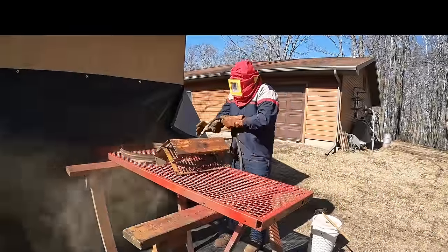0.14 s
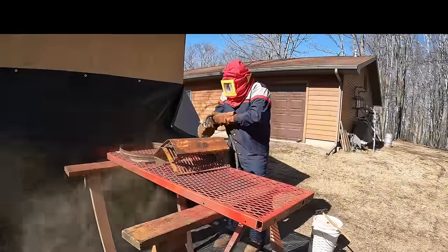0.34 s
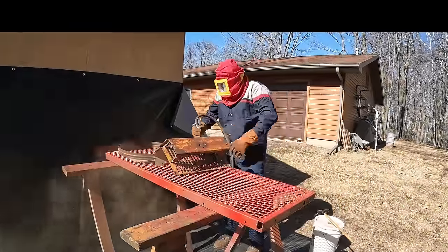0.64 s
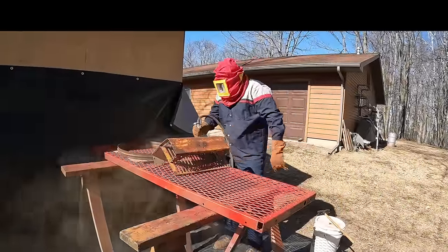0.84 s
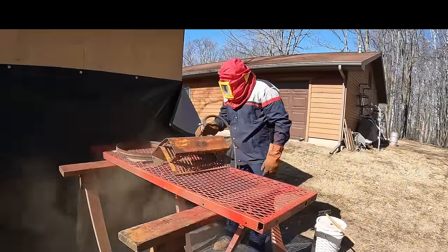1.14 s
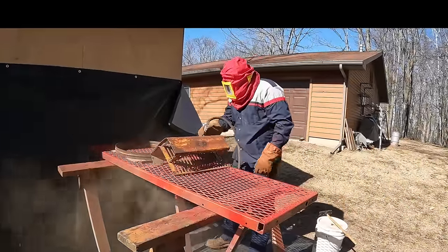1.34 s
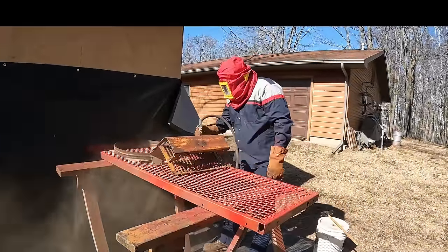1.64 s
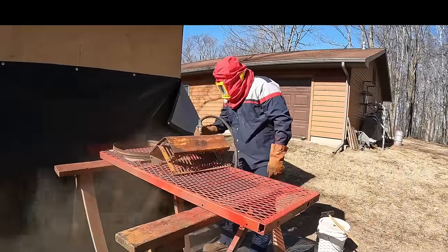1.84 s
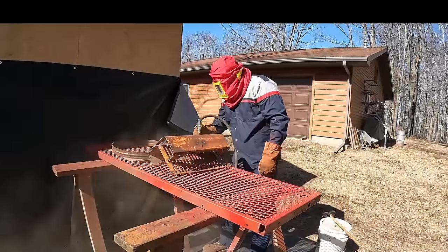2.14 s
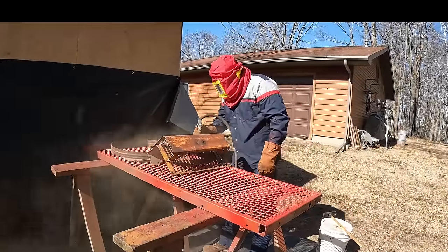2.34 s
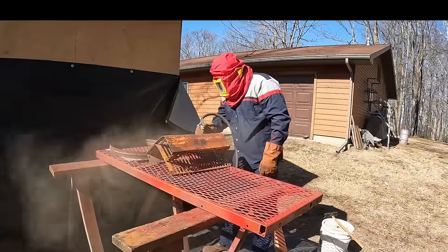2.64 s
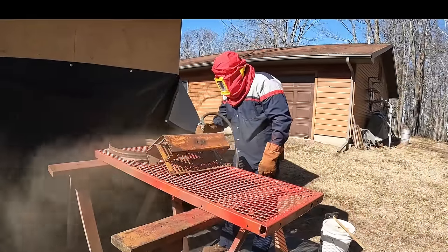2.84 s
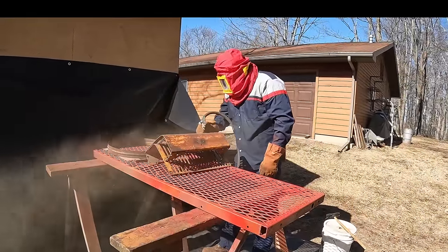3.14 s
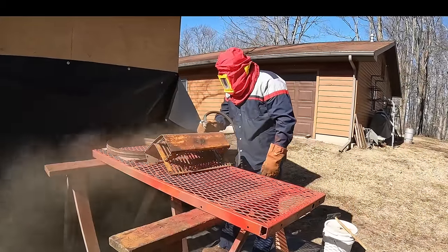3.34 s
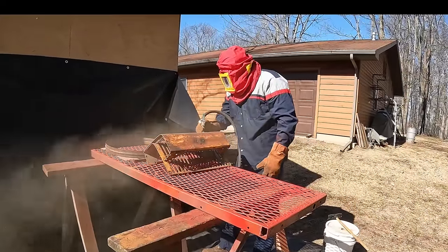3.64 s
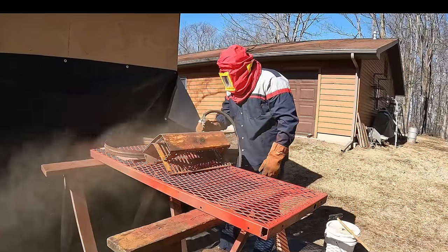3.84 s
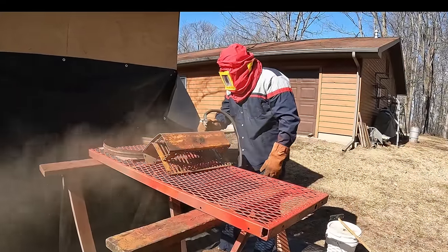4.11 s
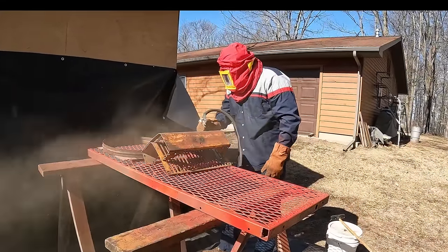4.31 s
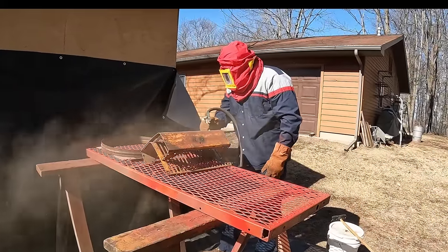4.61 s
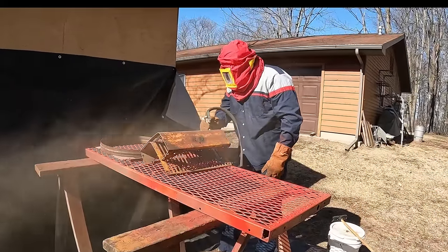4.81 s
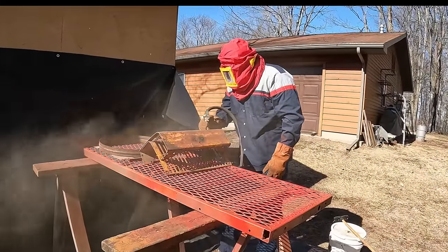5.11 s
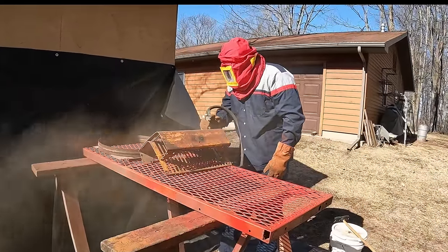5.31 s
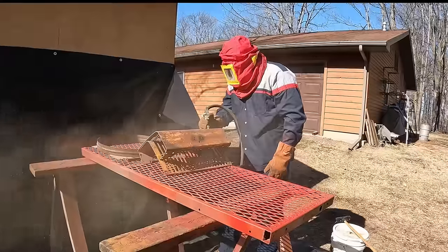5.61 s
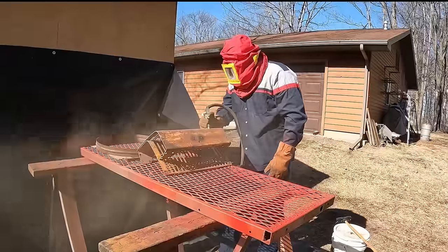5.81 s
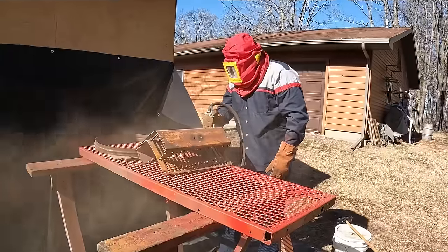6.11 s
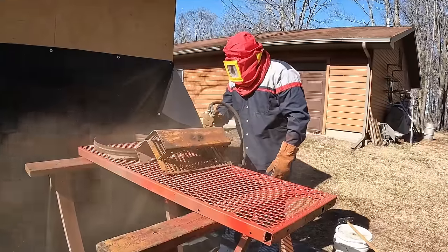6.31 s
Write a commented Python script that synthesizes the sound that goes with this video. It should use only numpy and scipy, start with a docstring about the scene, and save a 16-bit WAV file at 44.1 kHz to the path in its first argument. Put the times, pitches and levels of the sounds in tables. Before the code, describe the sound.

A quiet airy hiss rapidly swells into a strong, bright blast of air and grit against ribbed steel on a mesh table. A soft low push marks the landing. The jet then sweeps to and fro quickly, its metallic sizzle pulsing and dipping slightly as it slips off the edge. Light breeze and air puffs rumble at one outdoor microphone a few metres away; dry and open, without echo.

```python
"""Outdoors, a few metres from one microphone, a sandblaster scours a rusty steel part on a mesh table.
The jet of air and grit builds up, then the nozzle wags to and fro, about nine passes a second.
Filtered noise makes most layers: the jet hisses and fizzes, grit rings the steel, and each pass throws
roaring air and a puff at the microphone. The low thump and the shove of each puff are smooth pulses.
After about every second pass the jet slips off the part and the sound usually drops. A breeze rumbles."""
import sys
import numpy as np
from scipy import signal
from scipy.fft import rfft, irfft
from scipy.io import wavfile
from scipy.ndimage import uniform_filter1d

SR = 44100
rng = np.random.default_rng(int(sys.argv[2]) if len(sys.argv) > 2 else 0)


def to_wav(sig):
    """Store sig (one row per channel, or 1-D mono) as 16-bit WAV at the path in sys.argv[1].

    Samples outside -1..1 are clipped; the rate is SR.
    """
    pcm = np.clip(np.atleast_2d(sig), -1, 1) * 32767
    pcm = np.round(pcm).astype(np.int16)
    wavfile.write(sys.argv[1], SR, pcm.T)  # frames by channels


N = 284886  # length in samples

# slow level of the jet, before passes and slips: (time [s], hiss [dB], fizz of the top octave [dB])
JET_LEVELS = [(0, -38.5, -39), (.12, -35.5, -36.5), (.24, -31, -31), (.32, -26.5, -27), (.39, -19, -15.5),
              (.45, -21, -17.5), (.52, -16, -17.5), (.63, -19, -21), (.78, -22, -22.5), (1.08, -21.5, -21),
              (1.4, -19.5, -20), (1.9, -18.5, -21), (2.28, -17.5, -24), (2.45, -24.5, -27), (2.7, -18, -20),
              (3.15, -19, -20), (4, -19, -21.5), (5, -18.5, -22.5), (5.7, -18.5, -19.5), (6.46, -19, -20.5)]
# slow levels between passes: (time [s], steel ringing [dB], roar of deflected air [dB],
# drumming of the table frame [dB], puff [dB])
WORK_LEVELS = [(0, -42, -50, -64, -50), (.36, -26, -36, -65, -53), (.385, -26.5, -36, -37, -42),
               (.6, -27, -35.5, -33, -47), (.7, -31, -38, -43, -58), (1.2, -27.5, -38, -41.5, -49),
               (1.4, -21.5, -39, -42.5, -50), (1.55, -20, -38, -48, -60), (1.65, -24, -34, -37.5, -61),
               (2.1, -25.5, -37, -40, -46), (2.4, -27.5, -42, -54, -60), (2.6, -25, -40.5, -55, -70),
               (2.9, -27, -45, -49.5, -48.5), (3.5, -26.5, -42, -53, -52), (4.3, -28.5, -46.5, -55.5, -51),
               (5.1, -27.5, -45, -58, -49.5), (5.75, -26, -42.5, -52, -43.5),
               (6.46, -32.5, -40.5, -51, -43)]
# each pass of the jet over the part: (time [s], steel swell [dB], swell of air thrown at the mic [dB])
NOZZLE_PASSES = [(.385, -1, 0.5), (.5, -0.5, 1), (.599, 0, 0.5), (.857, 4, 5), (.952, 2, 3),
                 (1.077, 2.5, 2.5), (1.177, -1, 1), (1.265, 1, 1.5), (1.379, 0.5, 4), (1.5, -1.5, 2),
                 (1.655, 1, 2.5), (1.78, 3, -1), (1.86, 1.5, 1.5), (1.957, 0, -0.5), (2.093, 3, 2),
                 (2.17, 2.5, -3), (2.285, 6.5, 3.5), (2.351, 6, 5.5), (2.542, 6, 8.5), (2.635, 4, 2),
                 (2.748, 2.5, 1), (2.84, 3, 6), (2.966, 1.5, 6), (3.07, 3.5, -0.5), (3.177, 0.5, 7),
                 (3.294, 5, -6), (3.397, 2, 3.5), (3.497, 2.5, -1), (3.609, 5.5, 5.5), (3.712, 3, -2),
                 (3.826, 5.5, 9.5), (3.934, 3, 0), (4.034, 2.5, 8), (4.134, 2.5, -2), (4.252, 6, 10),
                 (4.379, 2, 3.5), (4.476, 2.5, 4.5), (4.601, 3.5, -1.5), (4.698, 7.5, 6), (4.8, 3, -1.5),
                 (4.912, 6.5, 10), (5.002, 2.5, 0), (5.126, 4.5, 10.5), (5.263, 2, -2), (5.34, 1, 4.5),
                 (5.469, 4, 1.5), (5.56, 2, 3.5), (5.673, 5, -0.5), (5.78, 1, 6), (5.916, 3, 0),
                 (6.001, 4, 6), (6.1, 4, 0), (6.204, 5, 6), (6.32, 6.5, -1), (6.417, 6, 5.5)]
# the jet slips off the part at the far end of a swing: (time [s], drop [dB], negative is a rise)
JET_SLIPS = [(.678, 4.5), (1.016, -1), (1.204, 4), (1.469, 1), (1.73, 1.5), (2.005, 4), (2.21, 5.5),
             (2.42, 2), (2.862, 1), (3.04, 3.5), (3.249, 3.5), (3.469, 6), (3.669, 4), (3.884, 2.5),
             (4.09, 3.5), (4.311, 3.5), (4.526, 1), (4.739, 1.5), (4.959, 3.5), (5.184, 3), (5.392, 1.5),
             (5.612, 2), (5.844, 1.5), (6.05, 2.5), (6.272, 2.5)]
# power share of the thin, lower-ringing panel in what the jet strikes: (time [s], share [0-1])
PANEL_SHARE = [(0, 0.74), (.6, 1), (1.1, 0.6), (1.35, 0.83), (2, 0.75), (2.6, 0.46), (3.2, 0.48), (4, 0.3),
               (5, 0.16), (5.7, 0.12), (6.46, 0.37)]
# the hollow between the ribs sings higher or lower as the jet moves along:
# (time [s], pitch [Hz], level added to the ring [dB])
HOLLOW_TUNE = [(0, 3800, -2.5), (.57, 4570, 12), (.86, 4900, 10), (1.33, 4060, 3), (2.3, 4470, 4),
               (2.55, 3250, 1.5), (3.7, 3260, 2), (4.2, 4060, 5.5), (5.1, 3900, 4), (5.5, 3570, -2),
               (6.46, 3900, 2)]
# strength of the breeze: (time [s], level [dB])
BREEZE_GUSTS = [(0, -44), (.35, -51), (.8, -66), (1.45, -49), (2.1, -67), (2.65, -59), (3.1, -46),
                (3.45, -67), (4, -64), (5.1, -48), (5.6, -52), (6.46, -48)]
# the jet lands: (time [s], pitch [Hz], envelope peak [dB], envelope standard deviation [s])
LANDING_THUMP = (.377, 70, -31, .006)

# Tone colours, relative levels only: (frequency [Hz], level [dB])
# the jet's hiss
HISS_COLOUR = [(2500, -24.5), (4500, -9), (6000, -3), (8200, -0.5), (10000, -6), (12000, -9),
               (16000, -16.5)]
# the top of the jet
FIZZ_COLOUR = [(6000, -24), (9000, -2.5), (11000, -1), (13000, -3.5), (15500, -8)]
# thick ribs of the part
THICK_COLOUR = [(900, -24), (1500, -8), (2300, -3.5), (3300, 3), (5000, -2), (7000, -3), (10000, -23.5)]
# thin panel of the part
THIN_COLOUR = [(900, -18), (1500, -5.5), (2100, 0.5), (2800, 3.5), (4000, -6), (6000, -1.5), (10000, -30)]
# air turned aside by the part
ROAR_COLOUR = [(250, -46), (450, -6.5), (700, 0.5), (1000, 1), (1400, 0), (2200, -2.5), (4000, -42.5)]
# drumming table frame
FRAME_COLOUR = [(120, -10), (200, -10), (290, 0), (400, -3), (480, -11.5), (590, -1), (750, -21)]
# puffs of air on the microphone
PUFF_COLOUR = [(15, 0), (40, -6), (90, -8), (200, -7.5), (500, -17.5), (1000, -24.5)]
# deep rumble of the breeze
BREEZE_COLOUR = [(15, 9), (35, -8), (60, -10), (100, -3), (170, -23), (400, -24)]
# modes that stand out of the ring: (frequency [Hz], width [Hz], level added in the thin panel [dB])
STEEL_MODES = [(1100, 70, 4), (2060, 90, 4), (2330, 80, 4), (3240, 90, 4), (3595, 90, 4), (3890, 80, 4),
               (4390, 80, 3), (4970, 100, 3), (6070, 100, 3), (6520, 100, 3), (6970, 100, 4),
               (7940, 120, 4)]

LUMPS_DB = 1  # rms lumpiness of the breeze
EDGE_HZ = 15750  # upper band limit
SLIP_FALL_S, SLIP_BACK_S = 0.024, 0.027  # a slip drops fast and comes back slower
SLIP_FIZZ, SLIP_STEEL, SLIP_ROAR = 0.94, 0.21, 0.079  # share of the drop in the other layers
PUFF_PER_DB = 1.68  # a puff grows this many dB for each dB of thrown air
SHOVE_DB, SHOVE_HZ = 8.5, 14  # shove of the diaphragm: gain over the puff, high-pass corner

SIZE, HOP = 2048, 256  # analysis frame and step, in samples
HZ = np.fft.rfftfreq(SIZE, 1 / SR)
T = np.arange(N) / SR


def gain_of(db):
    """Turns decibels into amplitude."""
    return 10 ** (np.asarray(db) / 20)


def evened(x):
    """Scales a signal to rms 1."""
    return x / np.sqrt(np.mean(x ** 2) + 1e-20)


def read(points):
    """Reads a tone colour on the frequency bins, along a logarithmic pitch scale."""
    f, db = np.transpose(points)
    return np.interp(np.log(HZ + 1), np.log(f + 1), db)[:, None]


def curve(table, column):
    """Draws one column of a table as a line, sample by sample."""
    rows = np.array(table)
    return np.interp(T, rows[:, 0], rows[:, column])


def pass_column(column):
    """Picks one column of the table of passes."""
    return np.array(NOZZLE_PASSES)[:, column]


def passes(heights, width_s):
    """Adds a flat-topped bell in time for each pass of the nozzle, as high as the given values."""
    out = np.zeros(N)
    for s, height in zip(pass_column(0), heights):
        near = slice(max(round((s - .12) * SR), 0), round((s + .12) * SR))
        out[near] += height * np.exp(-.5 * abs((T[near] - s) / width_s) ** 2.83)
    return out


def slips():
    """Lowers the level, in dB, around each moment the jet is off the part (a negative drop raises it)."""
    out = np.zeros(N)
    for s, drop_db in JET_SLIPS:
        near = slice(round((s - .1) * SR), round((s + .2) * SR))
        late = T[near] - s
        width_s = np.where(late < 0, SLIP_FALL_S, SLIP_BACK_S)
        out[near] -= drop_db * np.exp(-.5 * (late / width_s) ** 2)
    return out


def patches(bins, frames):
    """Makes a random field over frequency and time, smoothed over the given numbers of bins and frames."""
    field = rng.standard_normal((N // HOP + 9, len(HZ))).T
    for width, axis in ((bins, 0), (frames, 1)):
        length = field.shape[axis]
        k = np.fft.rfftfreq(length)
        bell = np.exp(-2 * (np.pi * k * width) ** 2)  # smoothing by a Gaussian bell
        if axis == 0:
            bell = bell[:, None]
        field = irfft(rfft(field, axis=axis) * bell, length, axis=axis)
    return evened(field)


def coloured(x, db):
    """Shapes a sound by a level field over frequency and time, then evens it to rms 1."""
    z = signal.stft(x, nperseg=SIZE, noverlap=SIZE - HOP)[2]
    z = z * gain_of(db)[:, :z.shape[1]]
    return evened(signal.istft(z, nperseg=SIZE, noverlap=SIZE - HOP)[1][:N])


def grit(spread_db):
    """A dense hail of grains: noise in which a few random samples are larger."""
    size = np.minimum(rng.exponential(1, N), 6)
    return rng.standard_normal(N) * gain_of(spread_db * size)


def paths():
    """Many reflections add at random phases over a diffuse bed: narrow ridges that drift at random."""
    scattered = patches(1.3, 7) ** 2 + patches(1.3, 7) ** 2
    return 10 * np.log10(1 + 1.3 * scattered)


def wind():
    """A lumpy breeze, and puffs from the passes that each trail a deep rumble, buffet the microphone."""
    puff_heights = gain_of(PUFF_PER_DB * pass_column(2))
    push = gain_of(curve(WORK_LEVELS, 4)) * passes(puff_heights, 0.026)
    fade = np.exp(-1 / (.06 * SR))  # the trail dies away with a 0.06 s time constant
    trail = signal.lfilter([1 - fade], [1, -fade], push)
    lumps = evened(uniform_filter1d(uniform_filter1d(rng.standard_normal(N), 2500), 2500))
    deep = gain_of(curve(BREEZE_GUSTS, 1) + LUMPS_DB * lumps) + 0.38 * trail
    # the smooth push also shoves the diaphragm, and the high-pass makes it swing back
    high_pass = signal.butter(2, SHOVE_HZ, "high", fs=SR, output="sos")
    shove = gain_of(SHOVE_DB) * signal.sosfilt(high_pass, push)
    puffs = push * coloured(rng.standard_normal(N), read(PUFF_COLOUR))
    rumble = deep * coloured(rng.standard_normal(N), read(BREEZE_COLOUR))
    return shove + puffs + rumble


def thump():
    """The landing jet gives one short low push of air: a sine under a bell."""
    s, hz, db, length = LANDING_THUMP
    bell = np.exp(-.5 * ((T - s) / length) ** 2)
    return gain_of(db) * bell * np.sin(2 * np.pi * hz * (T - s))


def roar(ridges_db):
    """Air turned aside by the part roars, swelling with the passes; the frame drums under it."""
    swell_db = passes(pass_column(2), 0.019) + SLIP_ROAR * slips()
    air = coloured(grit(1.85), read(ROAR_COLOUR) + 0.69 * ridges_db)
    drum = coloured(rng.standard_normal(N), read(FRAME_COLOUR))
    air_gain = gain_of(curve(WORK_LEVELS, 2) + swell_db)
    drum_gain = gain_of(curve(WORK_LEVELS, 3) + 1.08 * swell_db)
    return air_gain * air + drum_gain * drum


def hollow(width_hz):
    """The hollow between the ribs adds a broad resonance whose pitch wanders over the frames."""
    s, hz, db = np.transpose(HOLLOW_TUNE)
    t = np.arange(N // HOP + 9) * HOP / SR
    distance = 2 * (HZ[:, None] - np.interp(t, s, hz)) / width_hz
    return np.interp(t, s, db) / (1 + distance ** 2)


def steel(ridges_db):
    """Grit rings the part: its thin panel low, its thick ribs higher and clearer."""
    modes_db = sum(db / (1 + (2 * (HZ - hz) / width) ** 2) for hz, width, db in STEEL_MODES)[:, None]
    spot_db = modes_db + hollow(870) + ridges_db + 0.5 * patches(33.0, 2.1)
    share = np.clip(curve(PANEL_SHARE, 1), 0, 1)
    thin = coloured(grit(1.0), read(THIN_COLOUR) + spot_db)
    # the modes stand out a little more in the ribs
    thick = coloured(grit(1.8), read(THICK_COLOUR) + spot_db + 0.19 * modes_db)
    ring = np.sqrt(share) * thin + np.sqrt(1 - share) * thick
    level_db = curve(WORK_LEVELS, 1) + SLIP_STEEL * slips() + passes(pass_column(1), 0.024)
    return gain_of(level_db) * ring


def jet(ridges_db):
    """Rushing air and grit hiss and fizz; both levels follow the passes and the slips."""
    colour_db = ridges_db + 0.84 * patches(31.0, 3.5)
    hiss = coloured(grit(0.76), read(HISS_COLOUR) + colour_db)
    fizz = coloured(grit(0.84), read(FIZZ_COLOUR) + colour_db)
    steel_db = passes(pass_column(1), 0.028)
    air_db = passes(pass_column(2), 0.024)
    hiss_db = curve(JET_LEVELS, 1) + 0.27 * steel_db + 0.19 * air_db + slips()
    fizz_db = curve(JET_LEVELS, 2) + 0.034 * steel_db + 0.28 * air_db + SLIP_FIZZ * slips()
    return gain_of(hiss_db) * hiss + gain_of(fizz_db) * fizz


def scene():
    """All sources reach one microphone, heard on both channels."""
    ridges_db = paths()  # shared by roar, steel and jet
    mono = wind() + thump() + roar(ridges_db) + steel(ridges_db) + jet(ridges_db)
    return np.array([mono, mono])


def record(dry):
    """The input stage rounds the highest peaks; then a low-pass filter limits the band."""
    rounded = 1.3 * np.tanh(dry / 1.3)
    low_pass = signal.firwin(801, EDGE_HZ, window=("kaiser", 9), fs=SR)
    return signal.oaconvolve(rounded, low_pass[None], "same")


dry = scene()
out = record(dry)
to_wav(out)
```